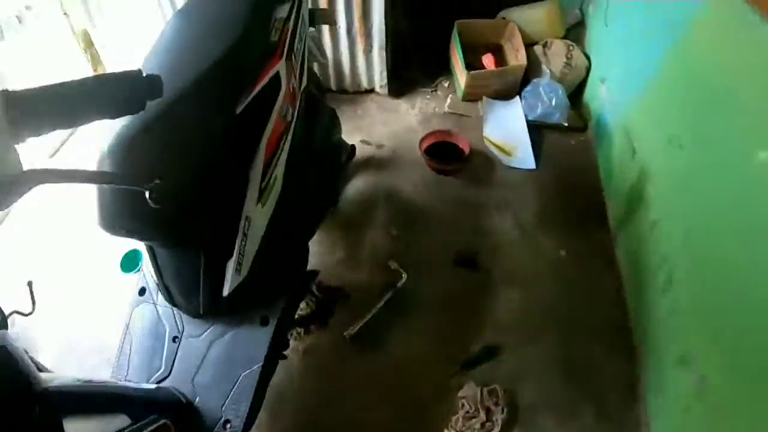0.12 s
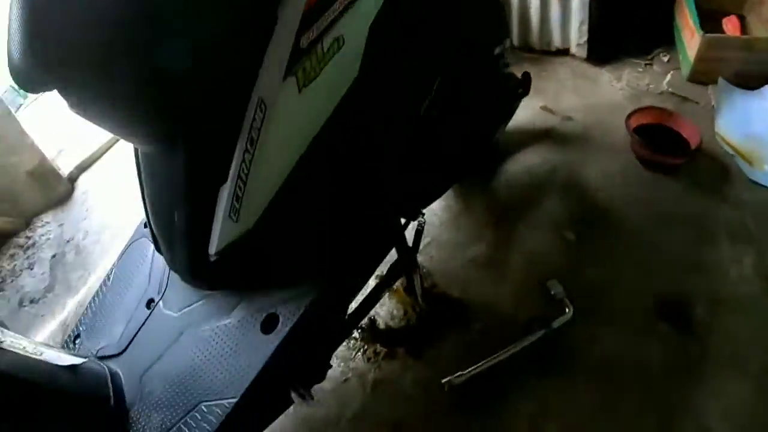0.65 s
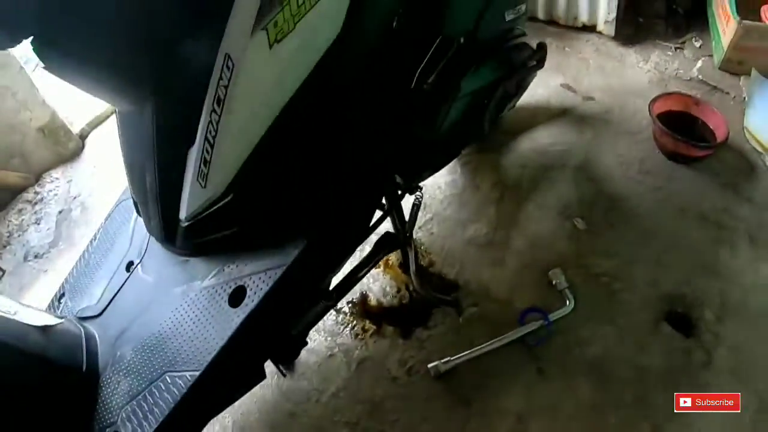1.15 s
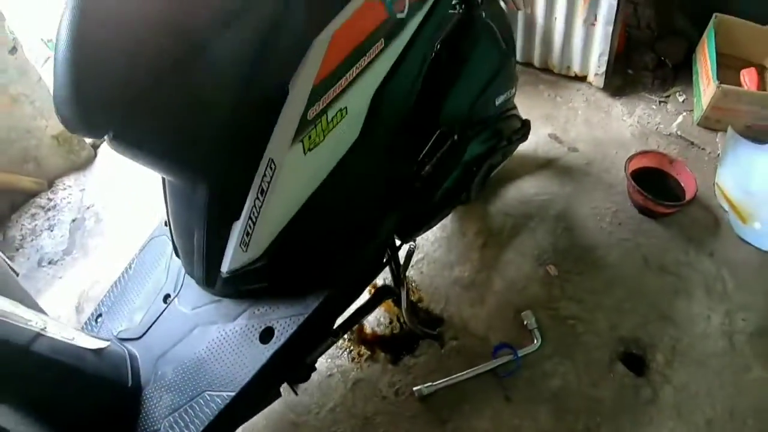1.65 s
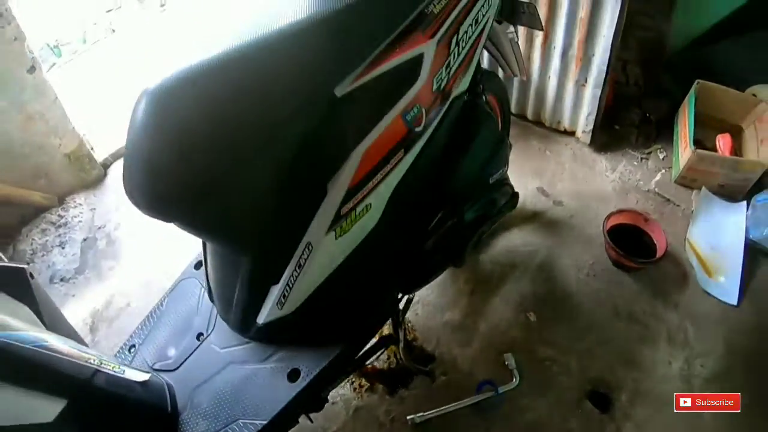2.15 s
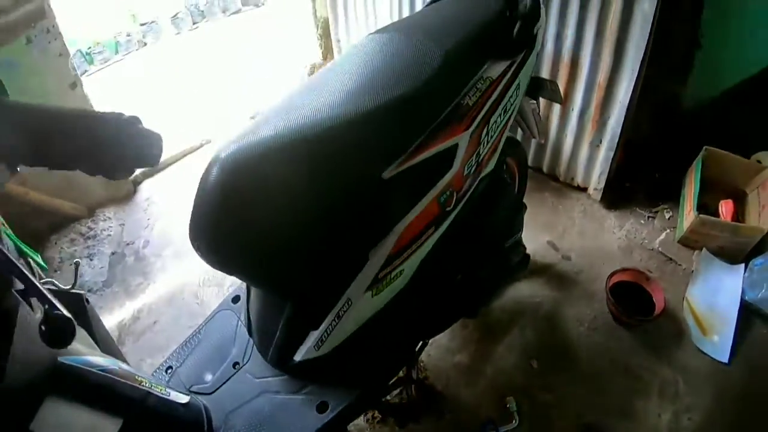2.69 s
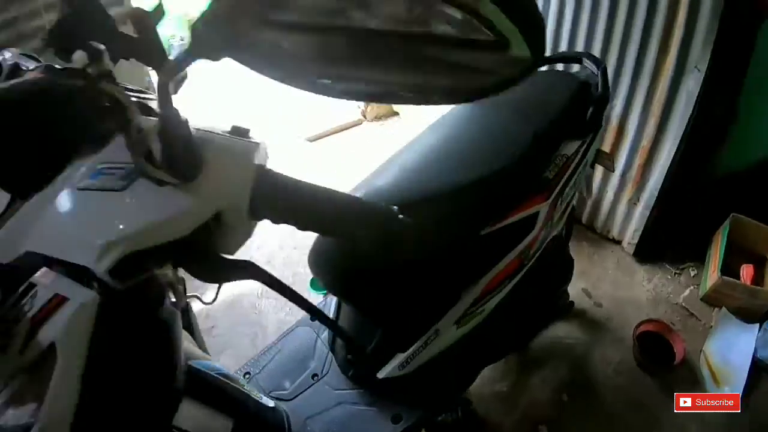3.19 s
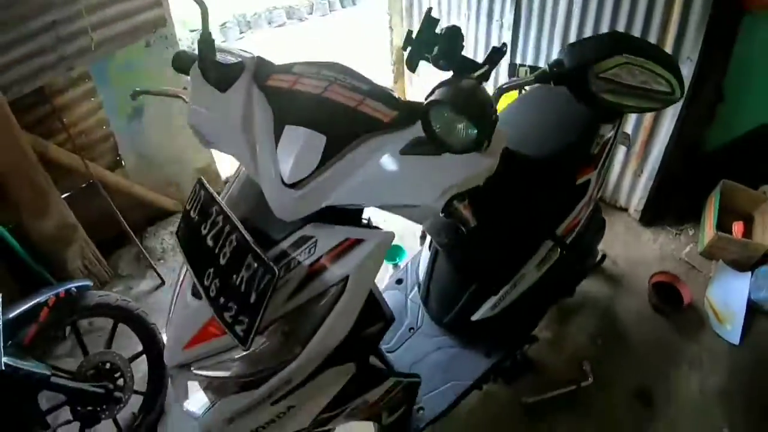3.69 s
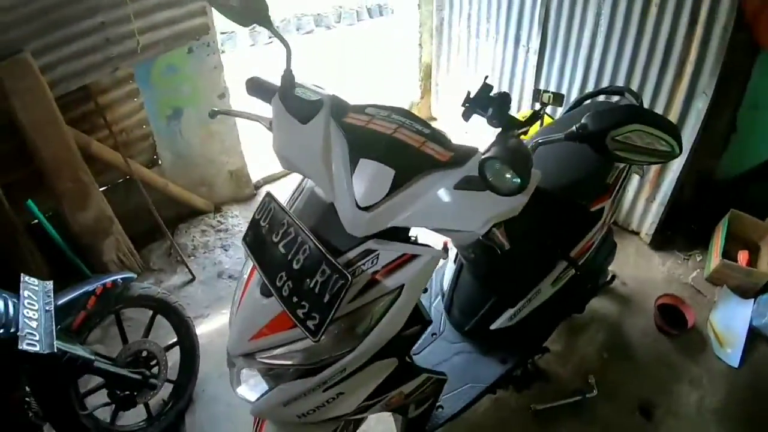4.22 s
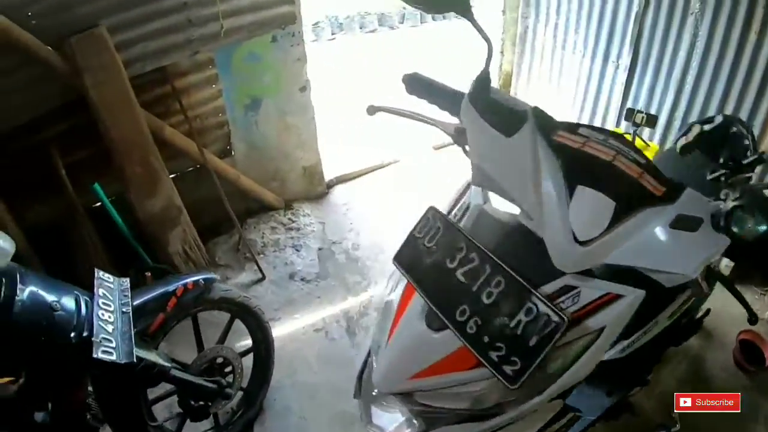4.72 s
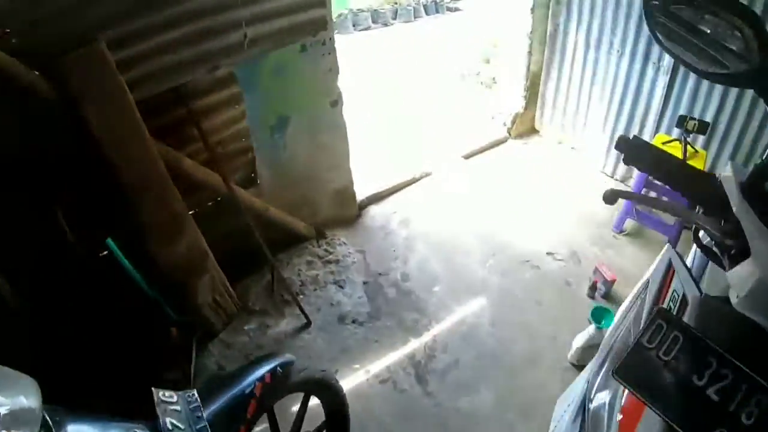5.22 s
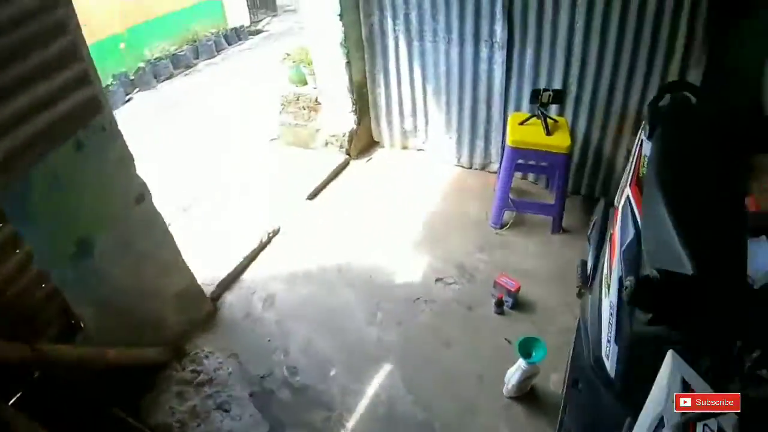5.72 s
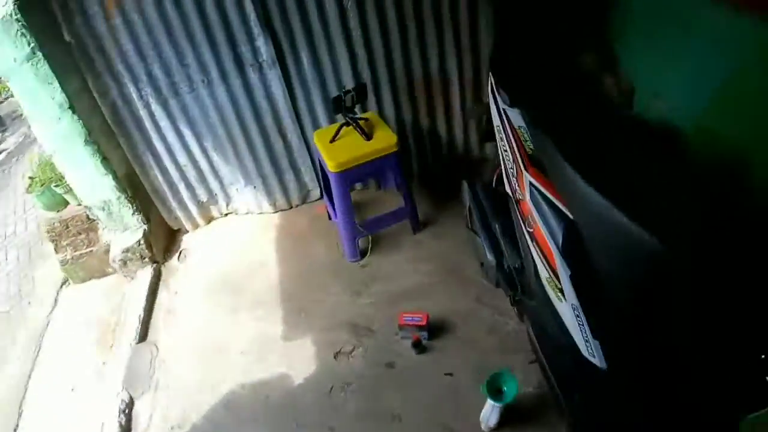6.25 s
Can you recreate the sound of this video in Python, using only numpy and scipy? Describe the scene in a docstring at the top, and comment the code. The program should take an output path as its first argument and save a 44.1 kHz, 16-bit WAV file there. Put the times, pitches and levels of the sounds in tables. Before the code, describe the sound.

Continuous idle of a four-stroke scooter, already running and never revved. Rapid chugging at roughly fifteen beats a second makes the small hard-walled room boom, loping and stumbling irregularly. Chain-like ticks, valve rattle, fan hiss and a lumpy low shake fill it out. A handheld microphone walks around it at close range, changing the bass and casing tone; a cluster of hollow burbles comes around five seconds.

```python
"""Scooter idling in a tin shed

A one-cylinder four-stroke idles in a tin-walled shed; the microphone is walked from its side to its front.
Each cycle an exhaust blow and an intake gulp ring the low modes of the shed; firings go strong and weak, some miss.
Above the thump, exhaust rumble, clatter and fan hiss are shaped noise swelling with the cycle, ticking at random.
Burbles are short ringing tones in the muffler; a lumpy low noise shakes stand and floor."""
import sys
import numpy as np
from scipy import signal
from scipy.fft import rfft, irfft, next_fast_len
from scipy.io import wavfile

SR = 44100
rng = np.random.default_rng(int(sys.argv[2]) if len(sys.argv) > 2 else 0)


def natural_amplitude(level_db):
    """Convert a level in decibels to a linear amplitude factor, elementwise."""
    exponent = np.asarray(level_db, float) / 20
    return 10 ** exponent


def log_audio(samples):
    """Write samples as a 16-bit WAV file to the path given in sys.argv[1]."""
    # one column per channel
    frames = np.atleast_2d(samples).T
    # limit to full scale, then quantise
    limited = np.clip(frames, -1, 1)
    pcm = np.round(limited * 32767).astype(np.int16)
    wavfile.write(sys.argv[1], SR, pcm)


N = 280917

# engine speed: t/s, rate/(cycles per s)
ENGINE_SPEED = [(0.0, 15.746), (0.24, 15.392), (0.48, 15.254), (0.72, 15.157), (0.96, 15.497),
                (1.2, 15.502), (1.44, 15.678), (1.68, 15.722), (1.92, 15.308), (2.16, 15.893),
                (2.4, 15.554), (2.64, 15.932), (2.88, 15.762), (3.12, 15.441), (3.36, 15.646),
                (3.6, 15.611), (3.84, 15.72), (4.08, 15.854), (4.32, 15.65), (4.56, 15.516), (4.8, 15.447),
                (5.04, 15.807), (5.28, 15.779), (5.52, 15.474), (5.76, 15.866), (6.0, 15.774),
                (6.37, 15.682)]
# crank position of the exhaust blow (cycles)
EXHAUST_AT = .252
# engine cycles followed, of which the first ones come before the sound starts
CYCLES, EARLY_CYCLES = 112, 6


def at_hz(points, hz):
    """Read a (Hz, value) table on a log-frequency axis."""
    table_hz, values = np.array(points).T
    return np.interp(np.log(hz), np.log(table_hz), values)


def in_time(rows):
    """Columns of a curve table at every sample."""
    s, *columns = np.transpose(rows)
    return [np.interp(np.arange(N) / SR, s, c) for c in columns]


def rms_one(x):
    """Scale to rms 1."""
    return x / np.sqrt(np.mean(x ** 2))


def bump(at_s, length_s):
    """A bell in time, height 1, fallen to 1/e at length_s either side."""
    return np.exp(-((np.arange(N) / SR - at_s) / length_s) ** 2)


def drift(rate):
    """Slow chance, spread 1: noise through two equal low-pass poles at rate (Hz), drawn every 40 samples."""
    r = np.exp(-80 * np.pi * rate / SR)
    noise = rng.standard_normal(N // 40 + 2002)
    slow = signal.lfilter([1], [1, -2 * r, r * r], noise)[2000:]
    return np.interp(np.arange(N) / 40, np.arange(len(slow)), rms_one(slow))


def ring(clicks, hz, t60):
    """A resonance: a unit click sets a sine of height 1 ringing, down 60 dB after t60 (s)."""
    r, w = natural_amplitude(-60 / (t60 * SR)), 2 * np.pi * hz / SR
    return signal.lfilter([0, np.sin(w)], [1, -2 * r * np.cos(w), r * r], clicks + 1e-18)


def coloured(spectrum):
    """Stereo noise shaped by a spectrum, left and right alike in the bass, in six patchy bands; rms 1."""
    # how alike left and right are: f/Hz, likeness/1
    likeness = [(60, 0.96), (130, 0.78), (260, 1), (550, 0.86), (1140, -0.022), (2390, 0.6), (4990, 0.44),
                (10400, -0.21)]
    # left minus right: f/Hz, level/dB
    left_lean = [(60, -6), (170, 0), (470, -1.5), (1330, -4.5), (3720, -1.5), (10400, -2.5)]
    patchy_db, patchy_hz = .45, 0.67
    size = next_fast_len(N)
    hz = np.maximum(np.arange(size // 2 + 1) * SR / size, 1)
    alike = np.clip(at_hz(likeness, hz), -1, 1)
    left_right = np.array([[1], [-1]])
    gain = natural_amplitude(at_hz(spectrum, hz) + at_hz(left_lean, hz) / 2 * left_right)
    sounding = np.flatnonzero((hz > spectrum[0][0]) & (hz < spectrum[-1][0]))
    out = 0
    for part in np.array_split(sounding, 6):
        mid, side = rfft(rng.standard_normal((2, size)))
        both = np.sqrt(1 + alike) * mid + np.sqrt(1 - alike) * side * left_right
        pair = np.zeros((2, len(hz)), complex)
        pair[:, part] = (gain * both)[:, part]
        out = out + irfft(pair, size)[:, :N] * natural_amplitude(patchy_db * drift(patchy_hz))
    return rms_one(out)


def lope(cycle, number):
    """Charge of each firing above the mean: strong and weak in turn, with the odd firings put in."""
    # spells in which the strong firings grow or fade: t/s, length/s, added charge/1
    spells = [(.3, .3, -.15), (1.3, .5, .3), (4.35, .3, -.15), (4.95, .2, -.2)]
    # firings that break the lope, misses below the mean: t/s, charge/1
    odd_firings = [(0.02, 0.08), (0.15, 0.67), (0.22, -0.97), (0.35, 0.06), (0.48, 0.07), (0.87, -0.48),
                   (1.0, -0.07), (1.13, -0.06), (1.39, -1.0), (1.51, -1.08), (1.77, -0.98), (1.9, -0.01),
                   (2.03, -0.0), (2.16, 0.29), (2.35, -0.68), (2.41, 0.58), (2.47, -0.58), (2.54, 0.68),
                   (2.6, -0.17), (2.85, -0.52), (3.04, 0.66), (3.11, -0.67), (3.24, -1.19), (3.3, 0.09),
                   (3.56, 0.09), (3.62, 0.21), (3.69, 0.26), (3.88, -0.83), (3.94, 0.68), (4.0, -0.74),
                   (4.26, -0.17), (4.38, 0.08), (4.77, -0.98), (5.03, -0.49), (5.15, -0.89), (5.22, 0.24),
                   (5.28, -0.83), (5.34, 0.26), (5.41, -0.76), (5.73, 0.59), (5.92, -1.03), (6.05, -0.17),
                   (6.24, 0.58)]
    base_strong, weak = .42, -.33
    stumble_s = 2.125  # from here the other half of the firings leads
    at = np.interp(number + EXHAUST_AT, cycle, np.arange(N)).astype(int)
    strong = base_strong + sum(share * bump(s, length)[at] for s, length, share in spells)
    is_weak = (number + (at > stumble_s * SR)) % 2
    charge = np.where(is_weak, weak, strong) + .05 * rng.standard_normal(len(number))
    for s, odd in odd_firings:
        charge[np.argmin(abs(at - s * SR))] = odd
    return charge


def strokes(cycle, at, sizes, jitter_s, late_s=0):
    """One click a cycle at crank phase `at`, from half a second early so that the shed is already ringing."""
    number, lead = np.arange(len(sizes)) - EARLY_CYCLES, SR // 2
    run_up = cycle[0] - np.arange(lead, 0, -1) * ENGINE_SPEED[0][1] / SR
    ahead = np.r_[run_up, cycle]
    # strokes past the end land in the spare room behind it and are cut off
    where = np.interp(number + at, ahead, np.arange(len(ahead)), right=len(ahead) + SR)
    where = where + SR * (late_s + jitter_s * rng.standard_normal(len(sizes)))
    clicks = np.zeros(len(ahead) + 2 * SR)
    clicks[where.astype(int)] = sizes
    return clicks[:len(ahead)]


def thump(exhaust, intake, fired, missed, along, across):
    """The strokes, a few milliseconds wide, ring pipe and shed; the modes change height and sign along the walk."""
    # standing waves that the microphone is walked through: f/Hz, t60/s
    modes = [(32.85, 0.21), (47.53, 0.16), (56.33, 0.19), (80.59, 0.31), (92.79, 0.22), (113.34, 0.05),
             (123.1, 0.27), (137.4, 0.21), (145.95, 0.27), (177.27, 0.08), (192.74, 0.22), (205.03, 0.09),
             (220, 0.15), (242.55, 0.05)]
    # signed height of each mode, by what rings it:
    # at the corner of the walk/1, change along the shed/1, change across it/1
    by_exhaust = [(-0.121, 0.033, 0.059), (-0.06, 0.035, -0.12), (-0.076, -0.124, 0.161),
                  (0.066, 0.106, -0.168), (0.246, -0.357, -0.173), (0.11, 0.233, 0.014),
                  (0.08, 0.03, -0.039), (-0.221, 0.163, 0.317), (0.011, -0.327, -0.074),
                  (-0.216, 0.16, 0.434), (0.036, -0.092, -0.119), (0.165, 0.104, -0.5),
                  (-0.045, -0.052, 0.261), (0.065, -0.038, -0.124)]
    by_intake = [(0.165, -0.018, 0.017), (-0.389, 0.152, 0.011), (-0.056, -0.138, -0.232),
                 (-0.004, 0.135, -0.074), (-0.109, -0.093, 0.25), (0.597, -0.422, -0.354),
                 (-0.058, 0.083, -0.06), (-0.205, 0.378, 0.089), (-0.158, -0.076, 0.478),
                 (-0.176, 0.168, 0.233), (0.082, 0.064, -0.231), (0.182, 0.047, -0.046),
                 (-0.056, 0.003, 0.089), (-0.072, -0.089, 0.176)]
    by_charge = [(0.069, 0.056, 0.004), (-0.216, 0.085, -0.106), (-0.146, 0.055, 0.128),
                 (-0.246, 0.357, 0.161), (0.778, -0.881, -0.392), (0.297, 0.184, 0.048),
                 (-0.027, -0.035, -0.05), (-0.343, 0.208, 0.471), (0.049, -0.259, -0.107),
                 (-0.249, -0.021, 0.029), (0.001, -0.001, -0.093), (0.319, 0.07, -0.38),
                 (-0.152, -0.084, 0.339), (0.061, -0.115, -0.171)]
    # signed height that a full miss adds to the nine lowest modes: height/1
    by_miss = (.315, -.408, -.061, .067, .05, .155, -.038, .053, 0)
    soft_hz = 130
    r = np.exp(-2 * np.pi * soft_hz / SR)
    soft = signal.lfilter([(1 - r) ** 2], [1, -2 * r, r * r], [exhaust, intake, fired, missed])
    out = np.zeros(N)
    for (hz, t60), *heights in zip(modes, by_exhaust, by_intake, by_charge):
        corner, per_along, per_across = ring(np.transpose(heights) @ soft[:3], hz, t60)[:, -N:]
        out += corner + along * per_along + across * per_across
    for (hz, t60), height in zip(modes, by_miss):
        out += ring(height * soft[3], hz, t60)[-N:]
    return out * natural_amplitude(np.array([[-.15], [.15]]))  # dB, left and right


def puff(clicks, rise_s, fall_s):
    """A swell after every click: a slow decay less a fast one."""
    s = np.arange(SR // 10) / SR
    swell = np.exp(-s / fall_s) - np.exp(-s / rise_s)
    return signal.fftconvolve(clicks, swell)[len(clicks) - N:len(clicks)]


def throb(cycle, db, at, sharp):
    """Gain that peaks once a cycle, db above its trough, mean power 1."""
    return rms_one(natural_amplitude(db * (.5 + .5 * np.cos(2 * np.pi * (cycle - at))) ** sharp))


def ticks():
    """Chain and tappets as a gain of mean power 1: short sharp swells at random."""
    ticks_per_s, share = 130, 0.17
    clicks = (rng.random(N) < ticks_per_s / SR) * rng.exponential(1, N)
    return rms_one(1 + share * puff(clicks, rise_s=0.00045, fall_s=0.0025))


def valve_gear(cycle):
    """Swell of the valve gear once a cycle, each of a chance size."""
    clicks = strokes(cycle, .65, rng.uniform(0.35, 1.7, CYCLES), jitter_s=0.0011)
    return 0.097 * puff(clicks, rise_s=0.00026, fall_s=0.019)


def exhaust_rumble(cycle, charge, muffler_m):
    """Low noise blown from the muffler, harder on strong firings, falling with distance."""
    # noise shape: f/Hz, level/dB per Hz
    spectrum = [(150, -8.5), (220, -1.5), (260, 1.5), (413, -10.5), (460, -9.5), (509, -10), (877, -21.5),
                (1000, -18), (1300, -59), (2200, -120)]
    level_db = -30  # at 1 m, ahead of the panels
    blows = strokes(cycle, -0.053, 1 + 0.53 * charge, jitter_s=0.00062)
    blown = rms_one(0.7 + puff(blows, rise_s=0.01, fall_s=0.017))
    return natural_amplitude(level_db) / muffler_m * blown * coloured(spectrum)


def casing_clatter(cycle, valves, casing_m):
    """Middle noise of the casing, ticking at random and swelling with cycle and valves."""
    # noise shape: f/Hz, level/dB per Hz
    spectrum = [(470, -29.5), (800, 2), (875, -5.5), (987, -6.5), (1230, -4), (2010, -7.5), (3450, -9),
                (4800, -21), (6240, -38), (10600, -120)]
    level_db = -34.5  # at 1 m, ahead of the panels
    beat = throb(cycle, db=1.9, at=0.62, sharp=1.8) * rms_one(1 + valves)
    return natural_amplitude(level_db) / casing_m * ticks() * beat * coloured(spectrum)


def fan_hiss(cycle, valves, casing_m):
    """High noise of the fan; it fills the shed and so follows distance only by a share."""
    # noise shape: f/Hz, level/dB per Hz
    spectrum = [(2470, -40), (4200, -5), (5110, -6), (6060, -0.5), (6910, -3.5), (7630, -3.5), (10000, -12),
                (10900, -19.5), (11400, -25), (14600, -31), (15300, -66)]
    level_db, follows = -45.5, 0.72  # at 1 m, ahead of the panels; power of the distance
    beat = throb(cycle, db=2.0, at=0.59, sharp=1.5) * rms_one(1 + 1.6 * valves)
    return natural_amplitude(level_db) / casing_m ** follows * ticks() * beat * coloured(spectrum)


def panels(noise):
    """Each resonance adds or takes away some of its band, by an amount that shifts as that panel is faced."""
    # panel and casing resonances and the gaps between them:
    # f/Hz, width/Hz, lift/dB, lift when faced/dB, faced at t/s
    resonances = [(277.6, 86, -26, 6.2, 16), (339, 71, -3.5, -1.5, -2.7), (479, 44, -17, -8, -4.5),
                  (868, 45, -7, 3, 3), (1256, 63, 0.5, -14.5, 2.5), (1870, 83, -1.5, 6, 2.3),
                  (316, 16.6, 2, 5.5, 3.5), (303, 50, 3.5, -3.5, 4.5), (506, 46, -0.5, 2, 7),
                  (1500, 670, 0.5, 2.2, 6.5), (1500, 900, -0.5, -1, 2), (412, 110, 2, 3.5, 1.6),
                  (400, 19, -0.5, 2, 4.5), (321, 12, 1, 3.5, -4), (2900, 900, 0.5, -1.5, 4.5),
                  (512, 22, 4, 10, 2.5), (681, 48, 3, 7.5, 1.5), (430, 280, 0, 2.5, 2.5),
                  (766, 90, 0, 2, 1.1), (995, 45, 4, 8, 6.6), (1119, 24, 5, 4, 5), (1370, 39, -0.5, 7, 2),
                  (1628, 23, 3.5, 7.5, 4.87), (2015, 74, 5, 6.5, 2.5), (2384, 37, 2.5, 9.5, 1.4),
                  (2715, 85, 3.5, 8, 1.4), (2977, 46, 4.5, 1, -4), (3480, 100, 2.5, 6, 2.5),
                  (3700, 82, 2.5, 1, 2), (6150, 500, -0.5, 2.5, 2.2), (7680, 430, 3, -0.5, -5.5),
                  (8200, 1800, 0.5, -2, 0.5)]
    facing_s = 0.71  # how long a panel stays faced
    out = noise.copy()
    for hz, width, lift_db, faced_db, s in resonances:
        r = np.exp(-np.pi * width / SR)
        poles = [1, -2 * r * np.cos(2 * np.pi * hz / SR), r * r]
        band = signal.lfilter([(1 - r * r) / 2, 0, (r * r - 1) / 2], poles, noise)
        out += band * (natural_amplitude(lift_db + (faced_db - lift_db) * bump(s, facing_s)) - 1)
    return out


def buffet():
    """Lumpy low shaking of stand and floor: band-passed noise of drifting level."""
    level_db, low_hz, high_hz = -36, 25, 120
    band = signal.butter(2, [low_hz, high_hz], "band", fs=SR, output="sos")
    low = signal.sosfilt(band, rng.standard_normal(N))
    return natural_amplitude(level_db + 2.2 * drift(2.5)) * rms_one(low)


def burbles():
    """Each burble in the muffler swells in a few milliseconds and rings out at its own pitch."""
    # burbles: t/s, peak level/dB, f/Hz
    burble_list = [(.21, -27, 315), (.46, -30, 549), (1.2, -27, 380), (3.17, -28, 310), (4.88, -27, 410),
                   (4.965, -28, 330), (5.04, -28, 385), (5.125, -28, 385), (5.46, -28, 300),
                   (5.52, -29, 400), (5.61, -28, 300), (5.755, -27, 305)]
    t60_s, swell_s = 0.12, 0.006
    out, s = np.zeros(N + SR), np.arange(SR // 4) / SR
    shape = (1 - np.exp(-s / swell_s)) * natural_amplitude(-60 * s / t60_s)
    for at, db, hz in burble_list:
        tone = np.sin(2 * np.pi * (hz * s + rng.random()))
        out[int(at * SR):][:len(s)] += natural_amplitude(db) * shape / shape.max() * tone
    return out[:N]


def scene():
    """Thump, rumble, clatter, hiss, shaking and burbles along the walk."""
    # path of the microphone: t/s, along/0-1, across/0-1, distance to casing/m, distance to muffler/m
    walk = [(0, 1, 0.6, 1.36, 1.2), (.4, 0.44, 0, 1.44, 1.2), (.75, 0, 0.47, 1.23, 1.23),
            (1.36, 0, 0.62, 1.26, 1.3), (1.9, 0.2, 0.22, 1.57, 1.53), (2.5, 0.41, 0.26, 1.5, 1.4),
            (3.2, 0.68, 0.18, 1.54, 1.87), (3.5, 0.98, 0.14, 1.75, 1.46), (3.8, 0.9, 0.35, 1.58, 1.4),
            (4.35, 0.98, 0.24, 1.66, 1.37), (4.8, 0.81, 0.35, 1.69, 1.18), (5.3, 0.74, 0.73, 1.74, 1.18),
            (5.6, 0.34, 0.98, 1.75, 1.32), (5.9, 0.77, 0.95, 1.79, 0.94), (6.37, 0.58, 1, 1.5, 1.35)]
    start_cycle, intake_at, miss_at = -.12, .479, .19  # crank positions (cycles)
    full_misses_s = (.22, 1.77, 3.24)
    late_s_per_charge = .0004  # strong firings follow a slow turn
    along, across, casing_m, muffler_m = in_time(walk)
    cycle = start_cycle + np.cumsum(in_time(ENGINE_SPEED)[0]) / SR
    number = np.arange(CYCLES) - EARLY_CYCLES
    charge = lope(cycle, number)
    late = late_s_per_charge * charge

    miss_number = np.round(np.interp(full_misses_s, np.arange(N) / SR, cycle) - EXHAUST_AT)
    missed = strokes(cycle, miss_at, np.isin(number, miss_number), jitter_s=0)
    blow_sizes, gulp_sizes = 1 + .04 * rng.standard_normal((2, CYCLES))
    exhaust = strokes(cycle, EXHAUST_AT, blow_sizes, jitter_s=.0001, late_s=late)
    fired = strokes(cycle, EXHAUST_AT, charge, jitter_s=.0001, late_s=late)
    intake = strokes(cycle, intake_at, gulp_sizes, jitter_s=.0001, late_s=late)

    valves = valve_gear(cycle)
    noise = exhaust_rumble(cycle, charge, muffler_m)
    noise = noise + casing_clatter(cycle, valves, casing_m)
    noise = noise + fan_hiss(cycle, valves, casing_m)
    low = thump(exhaust, intake, fired, missed, along, across)
    return low + panels(noise) + buffet() + burbles()


def roll_off(x):
    """The treble ends steeply here."""
    return signal.sosfilt(signal.butter(12, 15100, fs=SR, output="sos"), x)


def record(dry):
    """Each microphone port cuts the lowest bass at its own corner, so the two sides differ there; peaks are rounded."""
    # port corners, left then right: f/Hz
    port_cut_hz = (10.3, 19.6)
    ports = [signal.butter(2, hz, "high", fs=SR, output="sos") for hz in port_cut_hz]
    heard = np.array([signal.sosfilt(port, side) for port, side in zip(ports, dry)])
    rounded = 1.033 * np.tanh(heard / 0.77)
    return roll_off(rounded)


dry = scene()
out = record(dry)
log_audio(out)
```